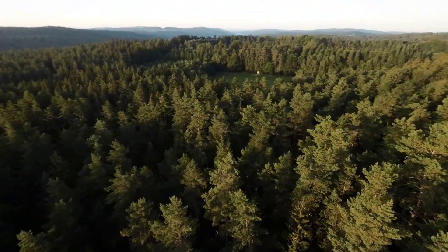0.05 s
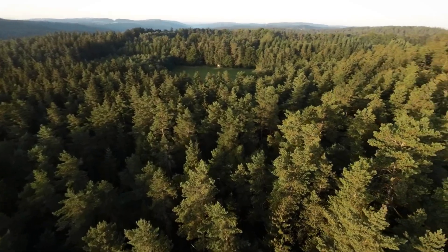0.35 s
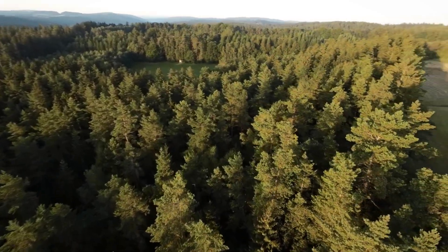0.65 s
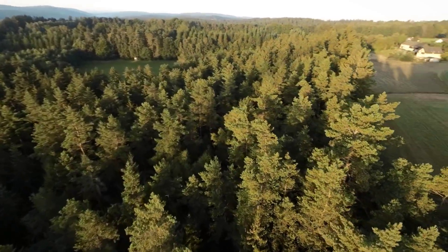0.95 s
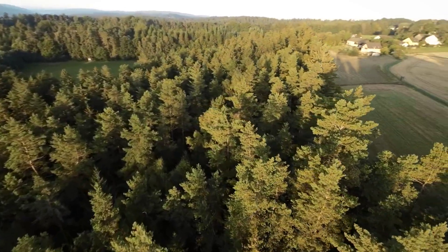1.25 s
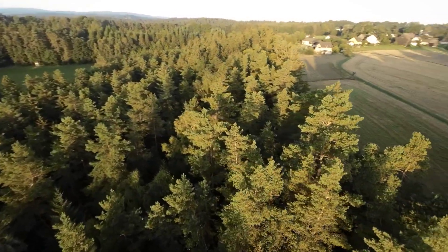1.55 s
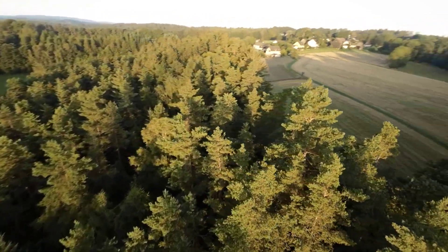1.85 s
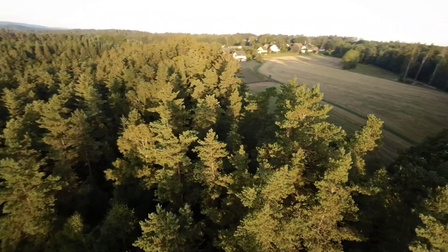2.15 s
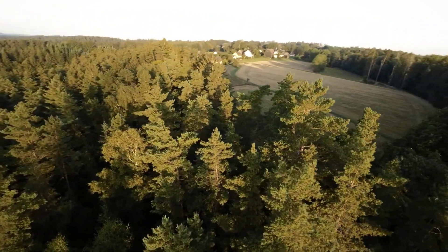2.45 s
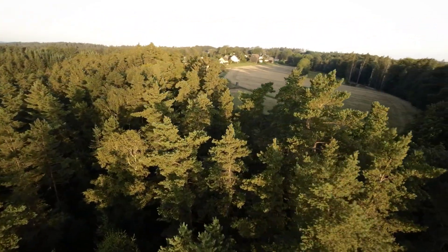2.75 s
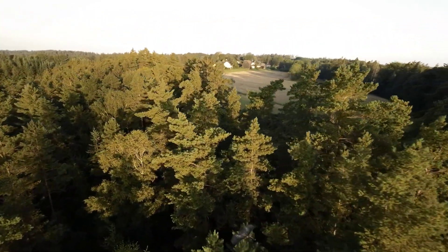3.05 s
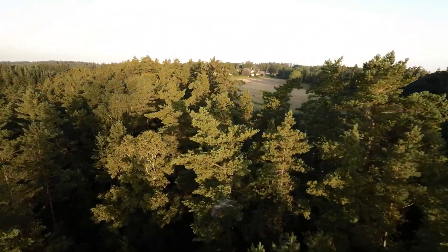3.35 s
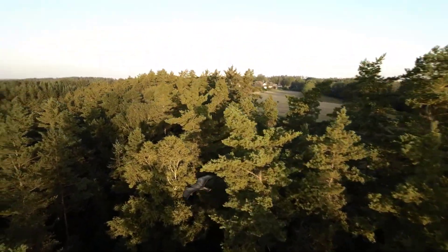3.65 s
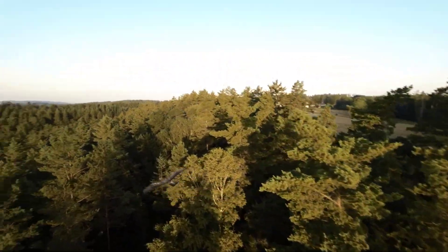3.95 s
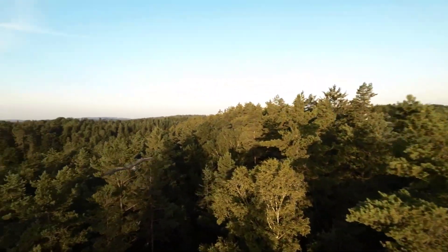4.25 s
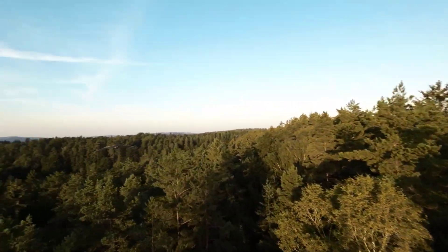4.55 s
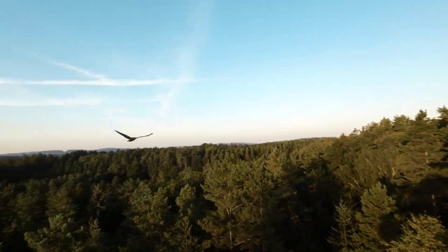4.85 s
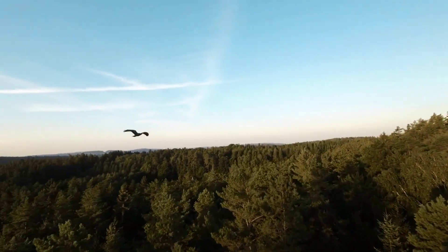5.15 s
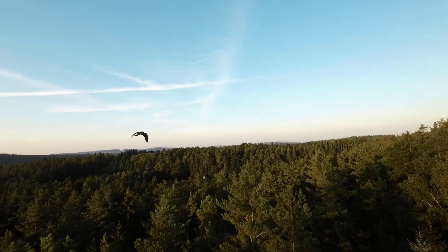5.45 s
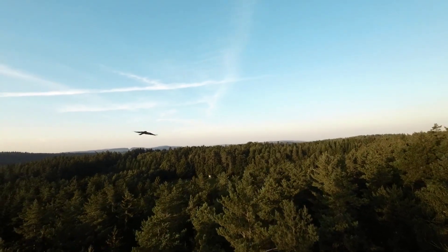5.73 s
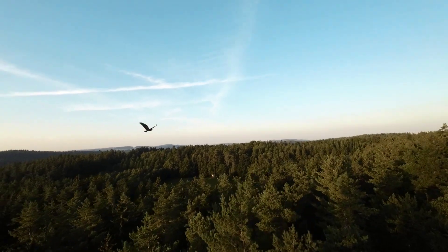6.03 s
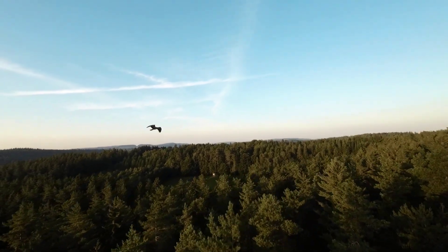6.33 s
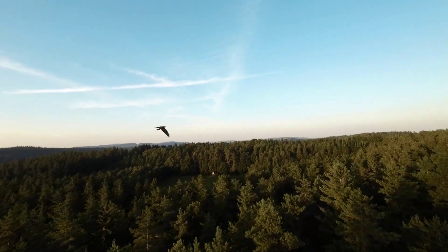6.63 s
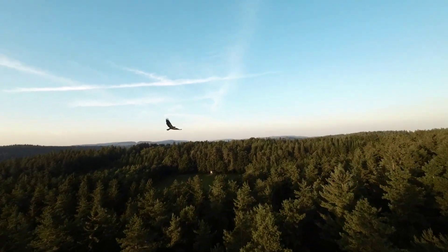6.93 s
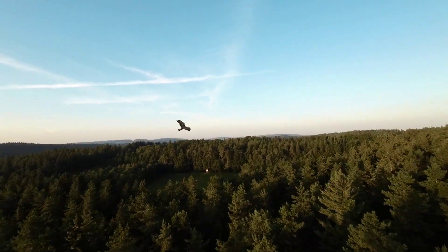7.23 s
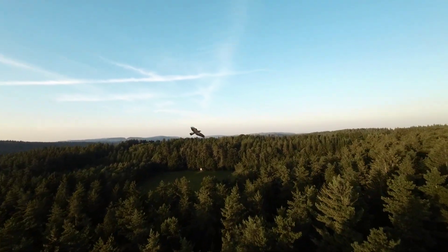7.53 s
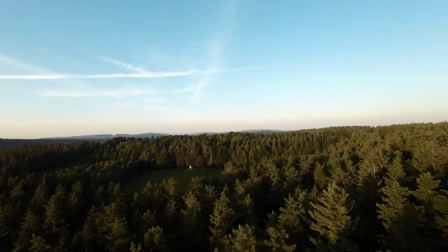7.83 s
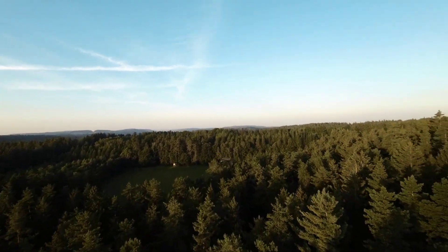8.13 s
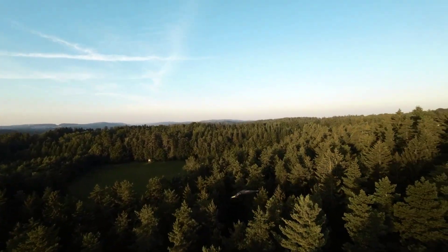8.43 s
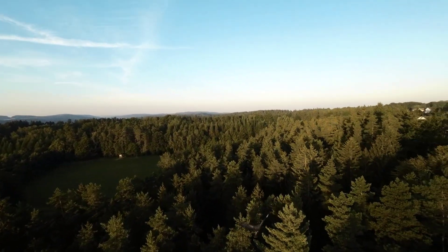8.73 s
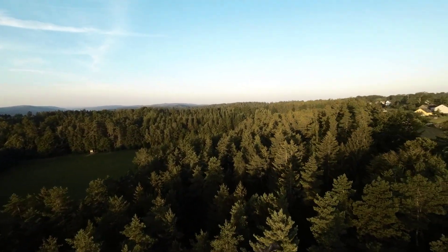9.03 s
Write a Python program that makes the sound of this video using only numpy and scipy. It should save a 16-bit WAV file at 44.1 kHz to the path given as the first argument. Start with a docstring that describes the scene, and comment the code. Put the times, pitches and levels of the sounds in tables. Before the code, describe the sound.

A bird of prey cries five times over a forest, a second or more apart. Each short cry starts as a thin rising squeal, then cracks down into a loud whistle that sags and turns hoarse. The bird is clear and ahead of the microphone, with a light echo from the trees. A small bird chatters and lisps faintly far off, over a soft steady hiss of air, a low rumble and a distant hum.

```python
"""A bird of prey cries five times over a forest. Each cry starts as a thin rising squeal, in which the two
sides of the syrinx may drift apart and beat, then cracks down to a loud whistle that sags and turns
hoarse by period doubling. The trees scatter the sound into a quick echo and a long reverberation.
A small bird chatters and lisps far off, over a steady hiss of air, a rumble and a distant hum."""
import sys
import numpy as np
from scipy import signal
from scipy.fft import rfft, irfft, next_fast_len
from scipy.io import wavfile
from scipy.ndimage import map_coordinates

SR = 44100
rng = np.random.default_rng(int(sys.argv[2]) if len(sys.argv) > 2 else 0)


def put_to_file(sound):
    """Save the sound as 16-bit audio at rate SR, in the file named by the first command-line argument."""
    columns = np.atleast_2d(sound).T  # one column per channel
    safe = np.clip(columns, -1, 1)
    whole_steps = np.round(safe * 32767)
    wavfile.write(sys.argv[1], SR, whole_steps.astype(np.int16))


N = 409248

# Strength of the air: t/s, rumble level/dB, hiss level/dB
AIR_LEVELS = [(0.0, -54, -51), (2.02, -54, -51.5), (3.05, -55.5, -52), (7.03, -54.5, -51.5),
              (8.09, -56.5, -53), (8.81, -54, -55), (9.28, -55.5, -55.5)]
# One whistle a row: t/s of start, leap up, drop, end; f/Hz at entry, held, in the tail, last;
# relative level/dB of 2nd harmonic, higher ones, period doubling while held, the same in the tail
WHISTLE_NOTES = [(1.287, 1.287, 1.386, 1.472, 3350, 3095, 2600, 1650, -2, -4, -50, -3),
                 (2.257, 2.257, 2.392, 2.442, 3450, 3146, 2560, 1820, 3, 6, -20, -6),
                 (4.625, 4.625, 4.744, 4.808, 3140, 3137, 2560, 1680, 1.5, -11, -29, -4),
                 (5.894, 5.939, 6.012, 6.085, 2340, 3128, 2700, 1850, -1, -2, -48, -3),
                 (7.073, 7.135, 7.202, 7.252, 2190, 2925, 2420, 2050, -2.5, -1.5, -52, -26)]


def amp(db):
    return 10 ** (np.asarray(db) / 20)


def unit(x):
    return x / np.sqrt(np.mean(x ** 2) + 1e-20)


def along(points, hz):
    """Interpolate (f/Hz, value) points on a logarithmic frequency axis."""
    f, v = np.transpose(points)
    return np.interp(np.log(hz + 1), np.log(f + 1), v)


def curves(rows, t):
    """Interpolate each column after the first at the times t."""
    times, *columns = np.transpose(rows)
    return [np.interp(t, times, column) for column in columns]


def ease(t, width):
    """A smooth step from 0 to 1 around t = 0."""
    return .5 + .5 * np.tanh(t / width)


def blend(a, b, share):
    return a + (b - a) * share


def wobble(rate, n):
    """n samples of a smooth random curve, rate knots a second."""
    return map_coordinates(rng.standard_normal(int(n * rate / SR) + 4), [np.arange(n) * rate / SR])


def phase_of(hz):
    """Phase is the time integral of frequency."""
    return 2 * np.pi * np.cumsum(hz) / SR


def add(track, s, sound):
    """Superpose a sound on the track at s seconds."""
    part = track[max(round(s * SR), 0):][:len(sound)]
    part += sound[:len(part)]


def filtered(x, response):
    """Linear filtering: multiply the spectrum by a frequency response."""
    m = next_fast_len(N + SR // 2)
    return irfft(rfft(x, m) * response(np.fft.rfftfreq(m, 1 / SR)), m)[..., :N]


def stereo_noise(gain):
    """Partial coherence: independent mid and side noise, coloured by gain(f), at rms 1."""
    # Likeness of left and right: f/Hz, correlation
    coherence = [(60, 0.9), (130, 0.91), (290, 0.8), (640, 0.84), (1410, 0.84), (3100, 0.73), (6820, 0.26),
                 (15000, 0.37)]
    angle = lambda hz: np.arccos(np.clip(along(coherence, hz), -1, 1)) / 2
    white = rng.standard_normal((2, N))
    mid, side = filtered(white, lambda hz: gain(hz) * [np.cos(angle(hz)), np.sin(angle(hz))])
    return unit(np.array([mid + side, mid - side]))


def air_rumble():
    """Low-frequency noise of fixed spectral shape and slowly drifting level."""
    # Rumble spectrum: f/Hz, relative density level/dB
    spectrum = [(12, -27.5), (20, 2), (61, 0), (102, 1), (173, -4.5), (204, -3.5), (259, -13.5), (307, -5),
                (350, -6.5), (460, -36.5), (770, -120)]
    db, _ = curves(AIR_LEVELS, np.arange(N) / SR)
    return amp(db) * stereo_noise(lambda hz: amp(along(spectrum, hz)))


def air_hiss(gain_db=1.45, dulling=1.1, shelf_hz=3000):
    """Broadband noise under a treble shelf: the weaker the hiss, the duller."""
    # Hiss spectrum: f/Hz, relative density level/dB
    spectrum = [(150, -25), (250, -4), (313, -10.5), (353, -7), (482, -6.5), (563, -4.5), (781, -6.5),
                (1120, -8.5), (1270, -9.5), (2200, -11.5), (2710, -17.5), (8040, -34.5), (10400, -48.5),
                (11400, -56.5), (15500, -53.5)]
    _, db = curves(AIR_LEVELS, np.arange(N) / SR)
    hiss = stereo_noise(lambda hz: amp(along(spectrum, hz)))
    treble = filtered(hiss, lambda hz: hz ** 4 / (hz ** 4 + shelf_hz ** 4))
    hiss += (amp(dulling * (db - np.median(db))) - 1) * treble
    return amp(db + gain_db + .3 * wobble(4.7, N)) * hiss


def distant_hum(usual_db=-56.5, waver_db=.6, follows_hiss=.8):
    """Narrow noise bands add in power to a hum that rises and falls with the hiss."""
    # Hum bands: centre f/Hz, bandwidth/Hz, relative level/dB
    bands = [(60, 10, -66.5), (265, 25, -65), (531, 30, -63.5), (574.3, 38, -60), (635, 30, -73.5),
             (1140, 25, -68)]
    power = lambda hz: sum(amp(2 * db) / width / (1 + (2 * (hz - centre) / width) ** 4)
                           for centre, width, db in bands)
    _, hiss_db = curves(AIR_LEVELS, np.arange(N) / SR)
    level = amp(usual_db + follows_hiss * (hiss_db - np.median(hiss_db)) + waver_db * wobble(2, N))
    return level * stereo_noise(lambda hz: np.sqrt(power(hz)))


def chatter(period_s=.0995, note_s=.09, low_hz=4000, arch_hz=500, gap_hz=750, scratch=.056, upper_db=-9):
    """Random frequency modulation makes a small bird's arched, three-partial notes scratchy."""
    # Bouts of notes: start t/s, end t/s, source level/dB
    bouts = [(0.003, 0.6, -54), (4.4, 4.5, -58), (4.93, 5.52, -57)]
    out = np.zeros(N)
    u = np.linspace(0, 1, int(note_s * SR))
    for start, end, db in bouts:
        for s in np.arange(start, end - period_s / 2, period_s):
            hz = (low_hz + arch_hz * np.sin(2 * u)) * (1 + scratch * wobble(900, len(u)))
            tone = np.sin(phase_of(hz)) + .8 * np.sin(phase_of(hz + gap_hz))
            tone += amp(upper_db) * np.sin(phase_of(hz * 1.5))
            add(out, s, amp(db) * np.sin(np.pi * np.sqrt(u)) * tone)
    return out


def squeal_course(t, row, start_hz=2700, knee_hz=3900, step_s=.009, part_s=.027,
                  swell_db=24, swell_ratio=1.45, overshoot_at_s=.029, overshoot_s=.018,
                  strain_db=9, strain_rough=.5):
    """Pitch relaxes upward, steps, then creeps as the voices part; overshoot thins and roughens them."""
    start, step, part, crack, rise_s, top_hz, creep, gap_hz, overshoot_hz, db, crescendo, *_ = row
    rough = row[-2]
    forced = overshoot_hz > 0
    rising = blend(knee_hz, start_hz, np.exp(-(t - start) / rise_s))
    strain = forced * np.exp(-((t - step - overshoot_at_s) / overshoot_s) ** 2)
    stepped = ease(t - step, step_s)
    hz = blend(rising, top_hz + creep * (t - crack) + overshoot_hz * strain, stepped)
    gap = gap_hz * (1 - np.exp(-np.maximum(t - part, 0) / part_s))
    swell_s = swell_ratio * rise_s / (1 + 2 * forced)  # a forced squeal starts abruptly
    db = db - swell_db * np.exp(-(t - start) / swell_s) + crescendo * (t - crack) - strain_db * strain
    return hz, gap, db, rough * stepped + strain_rough * strain


def rasp(phase):
    """Turbulence in the throat, amplitude-modulated into one puff a cycle, at rms 1."""
    # Turbulence spectrum: f/Hz, relative density level/dB
    spectrum = [(800, -35), (1600, -14), (2700, -3), (3800, 0), (5200, -1), (6600, -13), (8600, -12),
                (11000, -23), (15000, -45)]
    hz = np.fft.rfftfreq(len(phase), 1 / SR)
    puffs = rng.standard_normal(len(phase)) * (1 + .5 * np.sin(phase))
    return unit(irfft(rfft(puffs) * amp(along(spectrum, hz)), len(phase)))


def squeals(combination_db=-19, subharmonic_db=-23, jitter=.065, least_rough=.03, shimmer=.55,
            rasp_db=-19.5, clean_rasp_db=-.5, join_s=.008, release_s=.002,
            crack_lead_s=.01, crack_s=.007, crack_hz=3830, dip_hz=900, crack_rough=.4, dip_rough=.6,
            beak_hz=9900, beak_hz_per_db=70):
    """Two voices beat and breed combination tones; at the crack they merge, dip and turn chaotic."""
    # One squeal a row: t/s of start, step up, parting, crack; rise time/s, top f/Hz, creep/(Hz/s),
    # voice gap/Hz, overshoot/Hz, final level/dB, crescendo/(dB/s), relative level/dB of lower voice
    # and of overtones, roughness (0-1), crack level/dB
    notes = [(1.034, 1.132, 1.174, 1.271, .017, 4700, 400, 600, 0, -26.5, 3, 0, -30, .1, -23),
             (2.031, 2.05, 2.083, 2.24, .007, 4970, 2800, 950, 1300, -24.5, 45, 0, -16.5, .06, -22.5),
             (4.459, 4.525, 4.522, 4.61, .025, 4770, 3500, 520, 0, -25.5, 55, 3, -29, .19, -25.5),
             (5.762, 5.8, 5.845, 5.895, .016, 4500, 4800, 120, 0, -26, 50, -10, -28, .3, -25),
             (6.946, 7.003, 7.002, 7.072, .026, 4540, 1800, 380, 0, -33, 45, -2, -30, .22, -33)]
    out = np.zeros(N)
    for row, (whistle_start, *_) in zip(notes, WHISTLE_NOTES):
        start, _, part, crack, *_, lower_db, bright_db, _, crack_db = row
        t = np.arange(start, whistle_start + 10 * release_s, 1 / SR)
        hz, gap, db, rough = squeal_course(t, row)
        cracked = ease(t - crack + crack_lead_s, crack_s / 2)
        dip = np.exp(-((t - crack) / crack_s) ** 2)
        rough = np.clip(blend(rough, crack_rough, cracked) + dip_rough * dip, 0, 1)

        def voice_phase(voice_hz):
            pitch = blend(voice_hz, crack_hz, cracked) - dip_hz * dip
            return phase_of(pitch * (1 + jitter * (rough + least_rough) * wobble(1000, len(t))))

        high, low = voice_phase(hz + gap / 2), voice_phase(hz - gap / 2)
        low_gain = amp(lower_db) * ease(t - part - join_s, join_s) * (1 - cracked)
        tone = np.sin(high) + low_gain * (np.sin(low) + amp(combination_db) * np.sin(2 * high - low))
        overtones = np.sin(2 * low) + .5 * low_gain * (np.sin(low + high) + np.sin(2 * high))
        overtones *= amp(-np.maximum(2 * hz - beak_hz, 0) / beak_hz_per_db)
        tone += amp(bright_db) * (1 - cracked) * (overtones + amp(clean_rasp_db) * rasp(low))
        # The period doubles in the crack.
        tone += amp(subharmonic_db) * rough ** 2 * (np.cos(high / 2) + np.cos(1.5 * high))
        tone += amp(rasp_db) * rough * rasp(high)
        level = amp(blend(db, crack_db, cracked)) / np.sqrt(1 + low_gain ** 2)
        level *= ease(whistle_start - t, release_s)
        flutter = 1 + shimmer * rough * wobble(700, len(t))
        add(out, start, np.sqrt(2) * level * tone * flutter)
    return out


def whistle_course(t, row, climb_hz_per_s=6000, settle_s=.022, droop_hz=250, droop_s=.017,
                   leap_s=.002, drop_s=.006, slide_power=1.8, hoarse_from=.27, hoarse_spread=.15,
                   entry_hoarse_db=-11, held_hoarse_lead_s=.043, held_hoarse_s=.032):
    """Register jumps: the pitch may climb low first; it leaps up, holds, droops, drops and slides away."""
    start, leap, drop, end, entry_hz, held_hz, tail_hz, last_hz, *_, held_hoarse_db, tail_hoarse_db = row
    age = t - start
    tail = np.clip((t - drop) / (end - drop), 0, 1)
    climbing = (entry_hz < tail_hz) * ease(leap - t, leap_s)
    dropped = ease(t - drop, drop_s)
    held = held_hz + max(entry_hz - held_hz, 0) * np.exp(-age / settle_s)
    held -= droop_hz * np.exp(np.minimum(t - drop, 0) / droop_s)
    hz = blend(held, entry_hz + climb_hz_per_s * age, climbing)
    hz = blend(hz, blend(tail_hz, last_hz, tail ** slide_power), dropped)
    hoarse_tail = dropped * ease(tail - hoarse_from, hoarse_spread)
    hoarse = amp(tail_hoarse_db) * (hoarse_tail + amp(entry_hoarse_db) * climbing)
    hoarse += amp(held_hoarse_db) * ease(held_hoarse_s - abs(t - drop + held_hoarse_lead_s), drop_s)
    return hz, np.minimum(hoarse, 1)


def whistles(gain_db=.4, attack_s=.002, release_s=.012, break_dip=.65, break_s=.003, fourth_db=-5,
             sub_db=-6.5, sub_knee_hz=2560, sub_db_per_hz=.02, upper_halves_db=(0, -18, -25),
             steady_jitter=.0015, jitter=.042, shimmer=.55, rasp_db=-21, clean_rasp_db=-44):
    """Period doubling: as a near-pure whistle sags, it gains odd multiples of half its pitch and flutters."""
    # One envelope per whistle: t/s, level/dB
    envelopes = [
        [(1.286, -30), (1.296, -19), (1.316, -16), (1.384, -14), (1.436, -24), (1.472, -43)],
        [(2.256, -26), (2.268, -14), (2.3, -11), (2.394, -15), (2.426, -27), (2.442, -40)],
        [(4.624, -26), (4.634, -17), (4.662, -14), (4.752, -16), (4.788, -27), (4.808, -42)],
        [(5.894, -24), (5.91, -15), (5.994, -13), (6.052, -21), (6.085, -42)],
        [(7.073, -31), (7.081, -21), (7.095, -18), (7.127, -23), (7.153, -15), (7.233, -24), (7.252, -40)],
    ]
    # Transmission of throat and beak: f/Hz, level/dB relative to the fundamental
    throat = [(3700, -15), (4700, -8.5), (5300, -15), (5800, -42), (6250, -23), (6900, -25), (7800, -42),
              (9400, -39), (10300, -53), (11500, -62)]
    out = np.zeros(N)
    for row, envelope in zip(WHISTLE_NOTES, envelopes):
        start, leap, drop, end, *_, second_db, bright_db, _, _ = row
        t = np.arange(start, end, 1 / SR)
        hz, hoarse = whistle_course(t, row)
        phase = phase_of(hz * (1 + (steady_jitter + jitter * hoarse) * wobble(1100, len(t))))
        tone = np.sin(phase)
        for k, db in enumerate([second_db, bright_db, bright_db + fourth_db], 2):
            tone += amp(db + along(throat, k * hz)) * np.sin(k * phase)
        half_pitch_db = sub_db + sub_db_per_hz * np.minimum(hz - sub_knee_hz, 0)
        for k, db in enumerate([half_pitch_db, *upper_halves_db]):
            tone += hoarse * amp(db) * np.cos((k + .5) * phase)
        tone += (amp(rasp_db) * hoarse + amp(clean_rasp_db + bright_db / 2)) * rasp(phase)
        level = amp(gain_db + curves(envelope, t)[0]) / np.sqrt(1 + hoarse ** 2)
        level *= (1 - np.exp(-(t - start) / attack_s)) * (1 - np.exp((t - end) / release_s))
        level *= signal.windows.tukey(len(t), .04)
        catch = np.exp(-((t - leap) / break_s) ** 2) + .5 * np.exp(-((t - drop) / break_s) ** 2)
        level *= 1 - break_dip * catch  # the voice catches between registers
        flutter = 1 + shimmer * hoarse * wobble(550, len(t))
        add(out, start, np.sqrt(2) * level * tone * flutter)
    return out


def lisps(note_s=.07, fall=.16):
    """Downward frequency sweeps of one thin partial: the small bird's lisps."""
    # Lisps: t/s, starting f/Hz, source level/dB
    notes = [(3.219, 8300, -71.5), (4.25, 8500, -69.5), (4.36, 8060, -64.5), (5.61, 8200, -67),
             (8.56, 7840, -73.5), (8.7, 7835, -76)]
    out = np.zeros(N)
    u = np.linspace(0, 1, int(note_s * SR))
    for s, hz, db in notes:
        glide = hz * (1 - fall * u + .02 * wobble(900, len(u)))
        add(out, s, amp(db) * np.sin(np.pi * u) * np.sin(phase_of(glide)))
    return out


def trunk_echo(x, delay_s=.008, t60_s=.17):
    """Scattering by nearby trunks returns a quick, dense echo."""
    t = np.arange(SR // 4) / SR
    echo = rng.standard_normal(len(t)) * amp(-60 * t / t60_s) * (t > delay_s)
    return signal.fftconvolve(x, echo / np.linalg.norm(echo))[:N]


def forest_reverb(x):
    """Reverberation of the wood: each band decays exponentially, the treble first."""
    # Reverberation time: f/Hz, T60/s
    decay_times = [(500, 1.2), (3000, 1.6), (6000, 1.1), (12000, .4)]
    hz, t, spectra = signal.stft(rng.standard_normal(2 * SR), SR, nperseg=256)
    decay = amp(-60 * t / along(decay_times, hz)[:, None])
    tail = signal.istft(spectra * decay, SR, nperseg=256)[1]
    return signal.fftconvolve(x, tail / np.linalg.norm(tail))[:N]


def scene(trunks_db=-21.5, forest_db=-33.5, far_db=-3, far_trunks_db=-2, far_forest_db=-6):
    """Direct-to-reverberant ratio sets distance: both birds are ahead, the small one mostly echo."""
    cries = squeals() + whistles()
    far_bird = chatter() + lisps()
    echo = trunk_echo(amp(trunks_db) * cries + amp(far_trunks_db) * far_bird)
    reverb = forest_reverb(amp(forest_db) * cries + amp(far_forest_db) * far_bird)
    air = air_rumble() + air_hiss() + distant_hum()
    return cries + amp(far_db) * far_bird + echo + reverb + air


def record(dry, image_db=-5.7, carrier_hz=24000, top_hz=15830):
    """Spectral imaging: the top treble faintly mirrors the band below it, up to a sharp band limit."""
    treble = filtered(dry, lambda hz: (hz > carrier_hz - top_hz) & (hz < carrier_hz / 2))
    carrier = np.exp(-2j * np.pi * carrier_hz * np.arange(N) / SR)
    image = np.real(signal.hilbert(treble) * carrier)
    return filtered(dry + amp(image_db) * image, lambda hz: hz < top_hz)


dry = scene()
out = record(dry)
put_to_file(out)
```